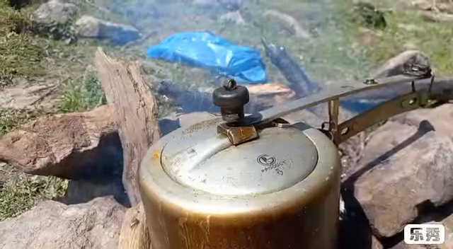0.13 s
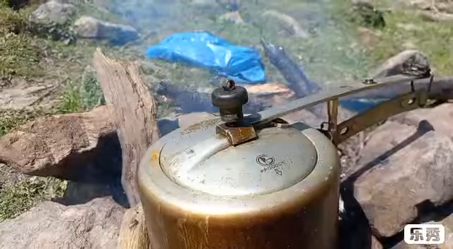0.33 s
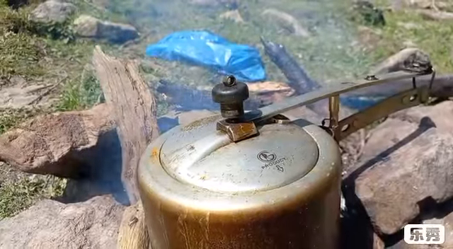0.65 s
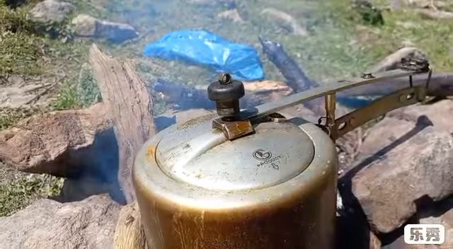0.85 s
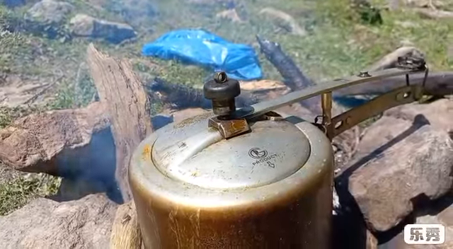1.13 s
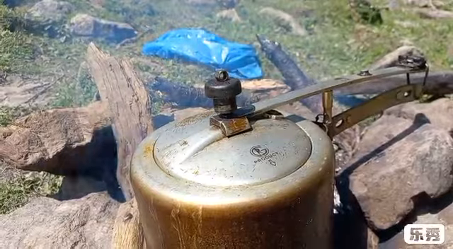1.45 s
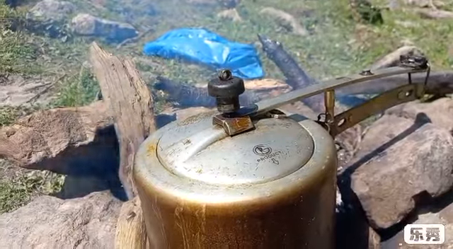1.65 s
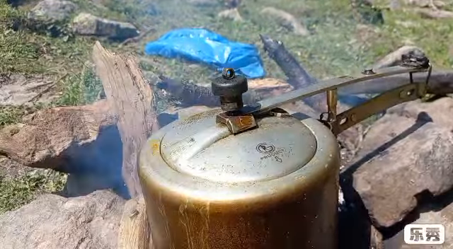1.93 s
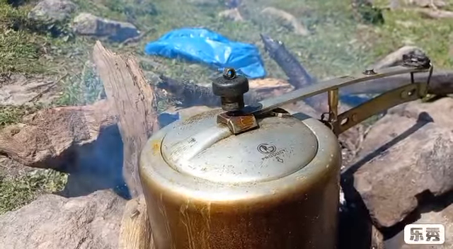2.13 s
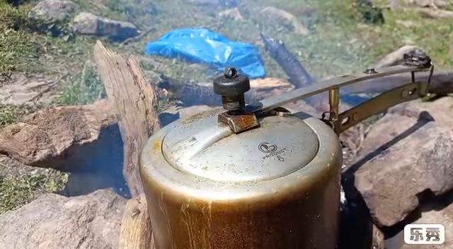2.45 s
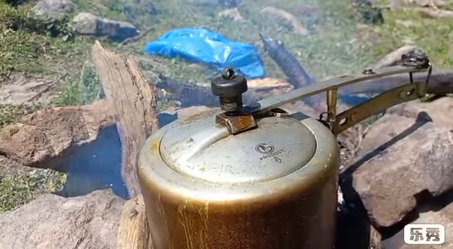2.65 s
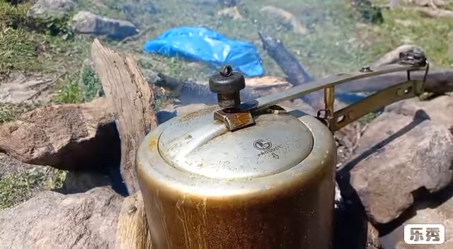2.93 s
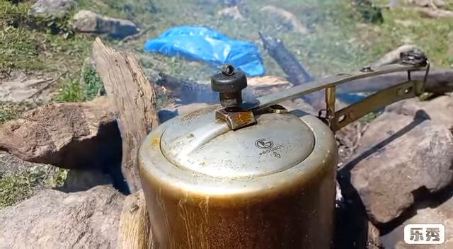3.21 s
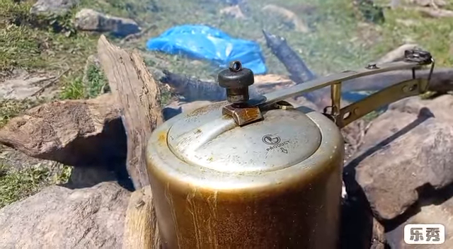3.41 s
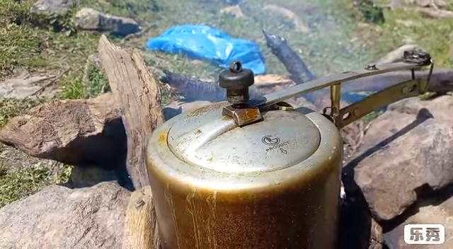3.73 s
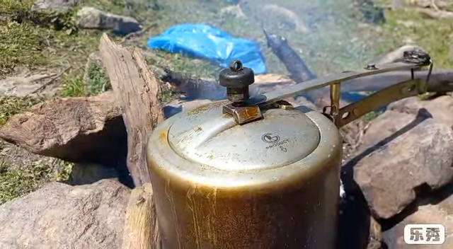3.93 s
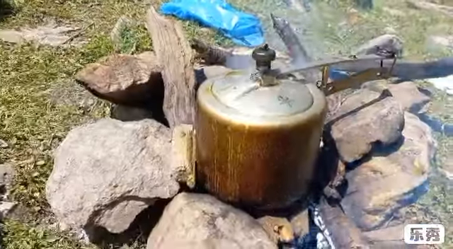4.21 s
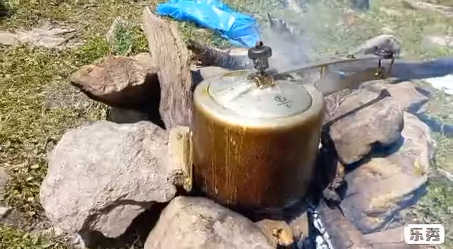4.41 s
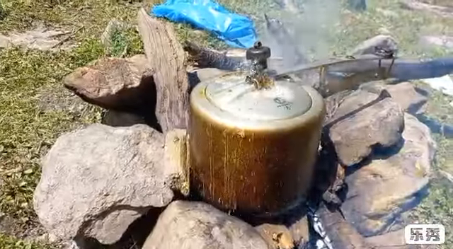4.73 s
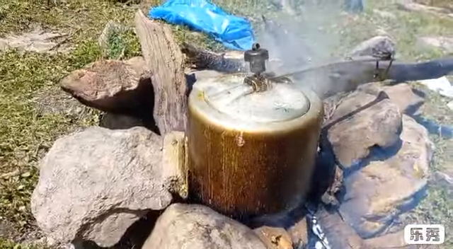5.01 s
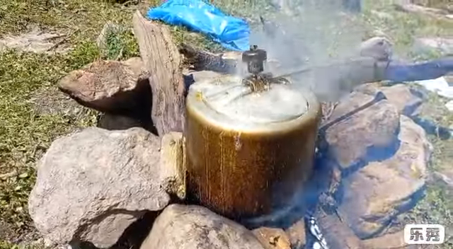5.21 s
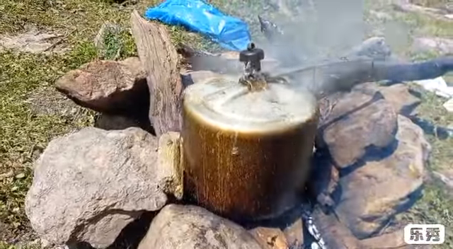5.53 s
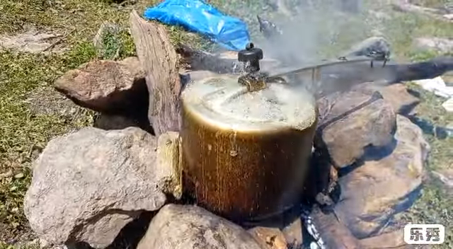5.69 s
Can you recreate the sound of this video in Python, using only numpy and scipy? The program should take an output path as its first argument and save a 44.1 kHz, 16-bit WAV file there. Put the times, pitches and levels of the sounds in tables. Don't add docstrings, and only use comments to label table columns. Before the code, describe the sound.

A pressure cooker on an outdoor wood fire is heard close up through a hand-held stereo phone. From the start, steam seeps from the valve as a thin, dry, high hiss, fairly steady and a little brighter on the left. Wind pushes on the microphone in soft, low, irregular thumps, mainly left: light bumps at 0.0 and 0.3 seconds, more around 0.9 and 1.2, then fuller ones from 2.2. Heavy, rough-edged buffeting runs from about 2.7 to 4.3 seconds. Very faint ticks of burning wood occur near 0.4, 1.1, 2.7 and 4.1. At about 4.5 seconds the weight lifts and the hiss jumps at once into a loud, broad rush of steam, full in the mids, with a low roar underneath. The roar swells around 5.0 and 5.2 seconds, then eases slightly while the hiss holds steady to the end. Slight echoes from lid and stones colour the steam; the treble is capped.

```python
import sys
import numpy as np
from scipy import signal
from scipy.fft import rfft, irfft, next_fast_len
from scipy.io import wavfile
from scipy.ndimage import uniform_filter1d, map_coordinates

SR = 44100
rng = np.random.default_rng(int(sys.argv[2]) if len(sys.argv) > 2 else 0)


def to_wav(s):
    ch = np.atleast_2d(s).T
    pcm = np.round(np.clip(ch, -1, 1) * 32767)
    wavfile.write(sys.argv[1], SR, pcm.astype(np.int16))


def rack_gain(trim_db):
    fader = np.asarray(trim_db, float)
    return 10 ** (fader / 20)


N = 258405

LIFT_S = 4.481


def unit(x):
    return x / np.sqrt(np.mean(x ** 2, axis=-1, keepdims=True) + 1e-20)


def along(points, hz):
    f, *columns = np.transpose(points)
    return np.array([np.interp(np.log(hz + 1), np.log(f + 1), c) for c in columns])


def curves(rows):
    s, *columns = np.transpose(rows)
    return np.array([np.interp(np.arange(N) / SR, s, c) for c in columns])


def wobble(rate):
    knots = rng.standard_normal(int(N * rate / SR) + 4)
    return map_coordinates(knots, [np.arange(N) * rate / SR])


def filtered(x, response):
    m = next_fast_len(N + 8192)
    return irfft(rfft(x, m) * response(np.fft.rfftfreq(m, 1 / SR)), m)[..., :N]


def fire():
    # (time [s], peak level [dB])
    ticks = [
        (.377, -50),
        (.441, -42),
        (1.095, -49),
        (2.725, -50),
        (4.11, -47),
    ]
    clicks, t = np.zeros(N), np.arange(SR // 100) / SR
    for s, db in ticks:
        fading = rack_gain(db + 8 - 60 * t / .005)
        clicks[round(s * SR):][:len(t)] += fading * rng.standard_normal(len(t))
    dull = filtered(clicks, lambda hz: 5 / (1 + (hz / 1800) ** 4) / (1 + (700 / (hz + 1)) ** 2))
    return dull * rack_gain([[-12], [0]])


def gusting(gusts, lull_db):
    rise_s, fall_s, fade_db = 0.02, 0.056, 26.5
    t = np.arange(N) / SR
    strengths = []
    for s, long, db in gusts:
        outside = np.maximum((s - t) / rise_s, (t - s - long) / fall_s).clip(0)
        strengths.append(db - fade_db * outside)
    return np.max(strengths, axis=0).clip(lull_db)


def swirl(spectrum, even):
    x = filtered(rng.standard_normal(N), lambda hz: rack_gain(along(spectrum, hz)[0]))
    swing = np.abs(signal.hilbert(unit(x)))
    return unit(x / (swing + .2) ** even)


def buffet(eddies, gust_db):
    # (frequency [Hz], level [dB])
    thump_colour = [(20, -58), (40, -15), (70, -4), (110, 2), (160, -8), (230, -16.5), (400, -44.5)]
    # (frequency [Hz], level [dB])
    edge_colour = [(100, -37), (185, 5.5), (250, 1.5), (330, -12), (450, -17.5), (650, -24.5), (1000, -58)]
    # (frequency [Hz], level [dB])
    port_colour = [(20, -36), (45, -7.5), (65, 4.5), (85, 1.5), (220, -1.5), (450, -4.5), (700, -19),
                   (900, -52)]
    shed_db = gust_db + 4 * wobble(45)
    body = rack_gain(2 * shed_db)
    edge = rack_gain(2.107 * (shed_db - 11.5 + 7.2 * wobble(30)))
    for s, db, ms, edge_db in eddies:
        near = slice(max(round((s - .15) * SR), 0), round((s + .15) * SR))
        u = np.abs(np.arange(N)[near] / SR - s) * 1000 / ms
        body[near] += rack_gain(2 * db) * np.exp(-3.8 * u ** 2)
        edge[near] += rack_gain(2 * (db + edge_db)) * np.exp(-5 * u ** 2)
    thump = np.sqrt(body) * swirl(thump_colour, even=0.9)
    thump = filtered(thump, lambda hz: 1 / (1 + (hz / 268) ** 6))
    push = thump + np.sqrt(edge) * swirl(edge_colour, even=0.82)
    return filtered(push, lambda hz: rack_gain(along(port_colour, hz)[0]))


def wind():
    # (start [s], length [s], strength [dB])
    gusts_left = [(0, 0.043, -35), (.05, 0.042, -55.5), (.23, .13, -44), (.46, .08, -59.5),
                  (.56, 0.043, -64), (.69, .09, -55.5), (.82, .18, -37.5), (1.02, 0.048, -49),
                  (1.11, 0.16, -36), (1.32, 0.147, -57), (1.53, .06, -59), (1.62, 0.099, -33),
                  (1.76, 0.16, -38.5), (2.0, 0.084, -49.5), (2.09, 0.27, -34.5), (2.47, 0.234, -35),
                  (2.74, 0.69, -32), (3.47, .16, -43), (3.65, .2, -32.5), (3.85, .12, -30.5),
                  (4.04, .44, -43), (4.6, 0.038, -47.5), (4.86, 0.16, -49), (5.1, .5, -53)]
    gusts_right = [(.05, 0.046, -66), (.42, 0.08, -72), (.63, .24, -59), (1.85, .38, -66),
                   (2.26, 0.17, -57.5), (2.55, .4, -44), (3.05, .1, -49), (3.17, 0.18, -44),
                   (3.38, .24, -53), (3.64, .18, -70.5), (3.85, .24, -51.5), (4.38, 0.11, -51),
                   (4.63, .5, -51), (5.45, .12, -58)]
    # (time [s], peak level [dB], length [ms], sharp edge re peak [dB])
    eddies_left = [(0.036, -25, 8.9, -31), (0.245, -32.5, 18, -37), (0.289, -26.5, 16, -32),
                   (0.866, -33, 22, -26), (0.942, -29.5, 26, -27), (1.21, -31, 29, -30),
                   (1.261, -32.5, 10, -24), (1.63, -31.5, 11, -17.5), (2.184, -24, 23, -15),
                   (2.425, -26.5, 26, -11.5), (2.69, -26, 31, -13), (2.768, -15.5, 22.5, 1),
                   (2.803, -15.5, 17, -2), (2.842, -20, 11, -14), (2.933, -23, 15, -21),
                   (2.997, -21.5, 24.8, -7), (3.041, -21, 12, -2), (3.147, -20.5, 5.9, 3),
                   (3.191, -22.5, 28, -6.5), (3.321, -23.5, 13, -4.5), (3.376, -24, 10.5, -10),
                   (3.676, -20, 24, -0.5), (3.755, -18.5, 11.8, 3.5), (3.825, -19.5, 16, -1),
                   (3.904, -22.5, 27, -4), (4.06, -17, 20, -13), (4.156, -26.5, 13, -40),
                   (4.253, -29.5, 12.7, -22), (4.302, -17.5, 12, -19), (4.995, -27, 13, -17)]
    eddies_right = [(0.294, -41.4, 19, -8), (0.815, -36, 18, -21), (0.84, -36, 15, -35),
                    (2.64, -29.5, 20, -3), (2.8, -34, 12, -14), (3.085, -40, 15, -19),
                    (3.225, -33, 11, -29), (3.275, -37, 20, -26), (3.441, -40, 15, -16),
                    (3.945, -37, 14, -16), (4.037, -33, 15, -7), (4.459, -33.5, 15, -21),
                    (4.68, -35.5, 9.1, -4), (4.903, -37, 25, -15), (5.008, -30.5, 14, -25),
                    (5.094, -40, 11, -17)]
    left = buffet(eddies_left, gusting(gusts_left, lull_db=-69))
    right = buffet(eddies_right, gusting(gusts_right, lull_db=-94))
    push = np.array([left, right])
    return push / (1 + np.abs(push / .45) ** 4) ** .25


def ripple(echoes, hz, strength):
    depth = strength / (1 + hz / 16000)
    return np.exp(depth * sum(g * np.cos(2 * np.pi * hz * ms / 1000) for ms, g in echoes))


def steam(colour, echo_left, echo_right, lead, alike, patchy_db, echo):
    z = signal.stft(rng.standard_normal((2, N)), nperseg=512)[2]
    field = uniform_filter1d(rng.standard_normal(z.shape[1:]), size=8, axis=0)
    field = uniform_filter1d(field, size=10, axis=1)
    pair = signal.istft(z * rack_gain(patchy_db * field / field.std()), nperseg=512)[1][:, :N]

    def mix(hz):
        turn = np.arccos(np.clip(along(alike, hz)[0], 0, 1)) / 2
        return np.array([np.cos(turn), np.sin(turn)])

    def port(hz):
        shift = np.exp(.5j * np.interp(hz, *np.transpose(lead)) * [[1], [-1]])
        echoes = [ripple(echo_left, hz, echo), ripple(echo_right, hz, echo)]
        return rack_gain(along(colour, hz)) * echoes * shift

    shared, apart = filtered(pair, mix)
    return unit(filtered(np.array([shared + apart, shared - apart]), port))


def seeping_steam():
    # (time [s], level [dB])
    loudness = [(0.1, -34.5), (0.7, -32.5), (1.6, -32), (2.6, -32.5), (3.3, -34), (4.3, -34)]
    # (frequency [Hz], left level [dB], right level [dB])
    colour = [(354, -31, -31.5), (620, -24, -24.5), (1064, -27.5, -21), (1188, -31, -15.5),
              (1380, -9.5, -16), (2510, -10, -12), (4540, -7.5, -12), (5400, -6, -9.5), (7450, -3.5, -11.5),
              (8980, -8.5, -14.5), (11670, -0.2, -10), (13200, -7, -14), (15200, -11.5, -25),
              (15700, -23, -14)]
    # (delay [ms], reflection [-1 to 1])
    echo_left = [(0.232, 0.069), (0.278, -0.061), (0.346, -0.032), (0.391, 0.076), (0.442, -0.078),
                 (0.544, 0.032), (0.601, -0.067), (0.652, 0.016), (0.743, -0.056), (0.799, -0.01),
                 (1.054, -0.057), (1.287, -0.034), (2.098, 0.021), (2.358, 0.091)]
    echo_right = [(0.159, 0.14), (0.21, -0.046), (0.283, -0.077), (0.368, -0.062), (0.544, 0.085),
                  (0.743, -0.063), (1.077, -0.033), (1.145, 0.062), (1.196, 0.055), (1.287, 0.06),
                  (1.644, -0.043), (1.689, 0.071), (1.882, 0.06), (3.01, -0.052)]
    # (frequency [Hz], phase [radians])
    lead = [(0, -1.5), (1590, 2), (2000, 3.5), (2410, 3.5), (2800, 6.5), (3170, 10), (4040, 13), (4250, 16),
            (5470, 17), (7910, 21.0), (11160, 22), (13000, 27), (13240, 37), (15500, 38)]
    # (frequency [Hz], likeness [0 to 1])
    alike = [(1000, 1), (1500, 0.68), (8000, 0.64), (9500, 0.28), (12000, 0.75), (13500, 0.1)]
    # (centre [Hz], width [Hz], level [dB])
    ridges = [
        (1033, 41, -5),
        (5250, 90, 3),
        (5950, 76, 3.5),
        (12270, 150, 2.5),
        (14900, 500, -2),
    ]
    seep = steam(colour, echo_left, echo_right, lead, alike, patchy_db=0.64, echo=2.06)
    seep = filtered(seep, lambda hz: rack_gain(sum(db * np.exp(-((hz - c) / w) ** 2) for c, w, db in ridges)))
    low = filtered(seep, lambda hz: 1 / (1 + (hz / 900) ** 6))
    seep = seep + low * (rack_gain(2.5 * wobble(12) - 1.0) - 1)
    facing_db = [[0], [-3.5]]
    return seep * rack_gain(curves(loudness) + facing_db + 0.071 * wobble(4.6) + 0.28 * wobble(40))


def open_jet():
    # (frequency [Hz], left level [dB], right level [dB])
    colour = [(149, -0.5, -4.5), (317, -6, 0.5), (580, 1, -2), (980, 3, 7), (1990, 3.5, 6),
              (3480, 5.5, 6.5), (4870, 6.5, 8), (5630, 1.6, 4), (8070, -3, -3), (10000, -0.8, -1.5),
              (12700, 0, 1.3), (14500, -4, -4), (15400, -8, -7), (15700, -11, -12)]
    # (delay [ms], reflection [-1 to 1])
    echo_left = [(0.164, 0.044), (0.499, -0.046), (0.55, 0.11), (0.714, -0.063), (0.867, 0.012),
                 (0.952, -0.02), (1.066, -0.054), (1.27, 0.11), (1.383, -0.17), (1.468, 0.044),
                 (2.098, -0.031), (2.211, 0.021), (2.432, -0.085), (2.687, 0.13)]
    echo_right = [(0.499, -0.024), (0.544, 0.06), (0.714, -0.07), (0.805, -0.077), (0.952, -0.13),
                  (1.899, 0.16), (2.063, -0.11), (2.336, -0.18), (2.381, 0.12), (2.642, -0.076),
                  (2.885, 0.049), (2.999, -0.11), (3.118, 0.082), (3.362, -0.17)]
    # (frequency [Hz], phase [radians])
    lead = [(0, -0.5), (1070, 1.08), (1800, 3), (2470, 3), (2820, 6), (3200, 11.0), (4950, 15.5),
            (5100, 14.5), (5410, 21.5), (6250, 31), (6900, 23.5), (10150, 24), (10550, 29.5), (15500, 37)]
    # (frequency [Hz], likeness [0 to 1])
    alike = [(150, 0.31), (600, 0.85), (1800, 0.81), (2350, 0.82), (4850, 1), (5000, 0.58), (5500, 1),
             (15000, 0.45)]
    # (time [s], rise [dB], length [ms])
    surges = [
        (4.49, 3, 22),
        (4.99, 3.5, 93),
        (5.05, -1, 30),
        (5.2, 4.5, 61),
    ]
    t = np.arange(N) / SR
    jet = steam(colour, echo_left, echo_right, lead, alike, patchy_db=0.8, echo=1.73)
    surge_db = sum(db * np.exp(-((t - s) / (ms * .001)) ** 2) for s, db, ms in surges)
    roar_db = -8 - 0.9 * (t - LIFT_S) + surge_db
    roar = filtered(jet, lambda hz: np.clip((hz - 60) / 160, 0, 1) * (hz < 1250))
    hiss = filtered(jet, lambda hz: hz >= 1250)
    level_db = -30 + 4.5 + 0.61 * wobble(12) + 0.51 * wobble(150)
    return (hiss + roar * rack_gain(roar_db + 8.5)) * rack_gain(level_db)


def valve():
    lifted = np.clip((np.arange(N) / SR - LIFT_S) / .0015, 0, 1)
    return (1 - lifted) * seeping_steam() + lifted * open_jet()


def hand_held(x, samples):
    sway = samples * wobble(2.66)
    return np.array([map_coordinates(v, [np.arange(N) + side * sway]) for v, side in zip(x, (1, -1))])


def scene():
    return hand_held(valve(), samples=.08) + wind() + fire()


def gate(x, waver_db):
    # (frequency [Hz], threshold re mean hiss of the moment [dB])
    thresholds = [(100, -13), (400, -13), (700, -13), (1000, -16), (1500, -16), (3000, -12.5), (8000, -13),
                  (12500, -12), (14000, -10.5), (15800, -13.5)]
    hz, _, z = signal.stft(x, SR, "cosine", nperseg=2048)
    power = np.abs(z) ** 2
    edges = np.r_[0:64:4, 64:320:8, 320:1025:16]
    widths = np.diff(np.r_[edges, len(hz)])
    bands = np.add.reduceat(power, edges, axis=1) / widths[:, None]
    hiss = power[:, (hz > 1500) & (hz < 15000)].mean(axis=1, keepdims=True)
    waver = waver_db * unit(uniform_filter1d(rng.standard_normal(bands.shape), size=4, axis=2))
    waver -= np.clip(6 * (rng.standard_normal((2, 1, z.shape[2])) - 1), 0, 12)
    threshold_db = along(thresholds, hz[edges] + 40)[0][:, None] + waver
    kept = bands > hiss * rack_gain(2 * threshold_db)
    return signal.istft(z * np.repeat(kept, widths, axis=1), SR, "cosine", nperseg=2048)[1][:, :N]


def top_cut(x):
    return signal.sosfilt(signal.butter(12, 15770, fs=SR, output="sos"), x)


def record(dry):
    mix = gate(dry, waver_db=2.6)
    return top_cut(mix)


dry = scene()
out = record(dry)
to_wav(out)
```